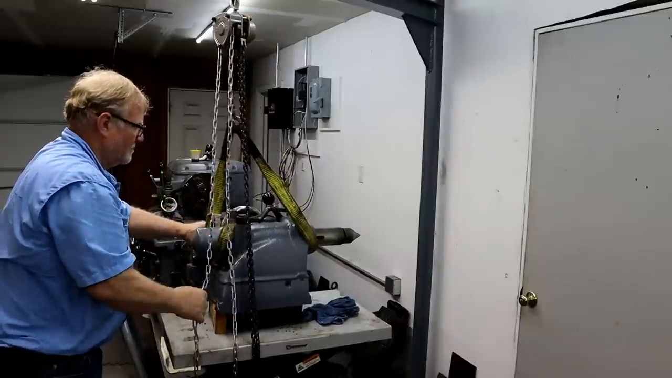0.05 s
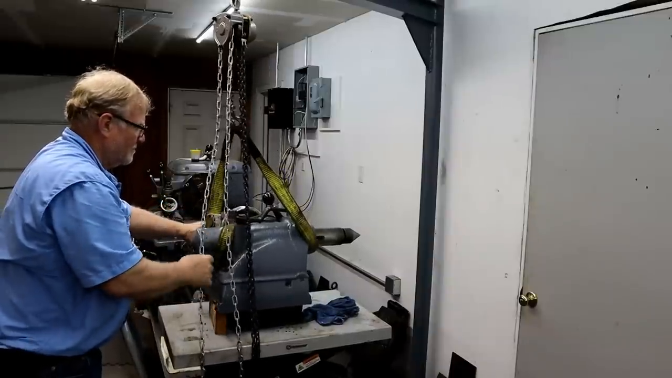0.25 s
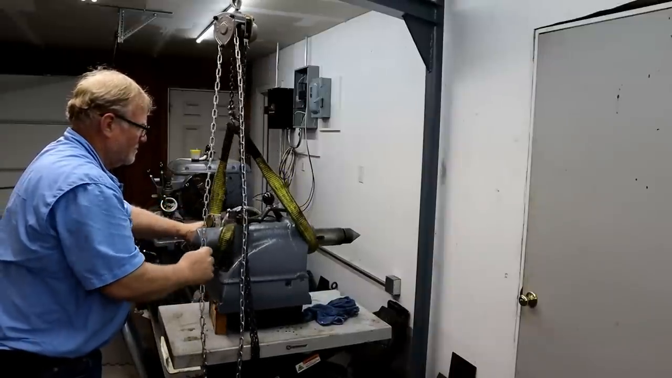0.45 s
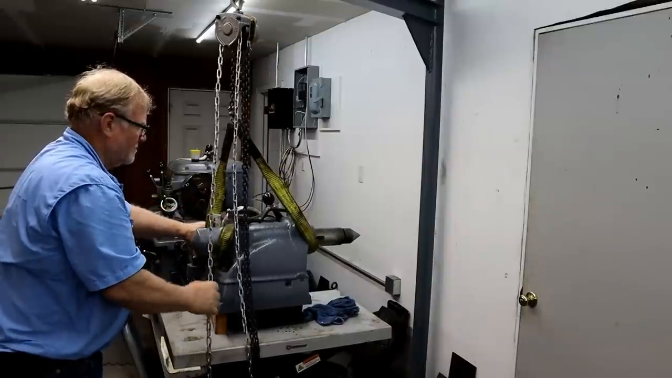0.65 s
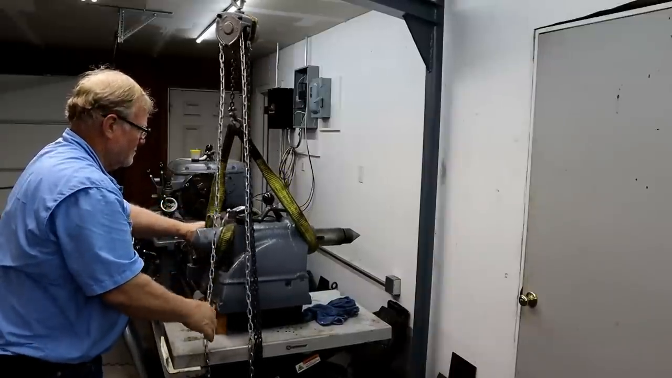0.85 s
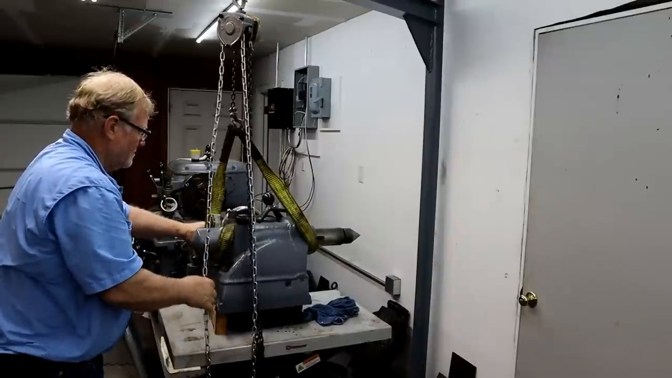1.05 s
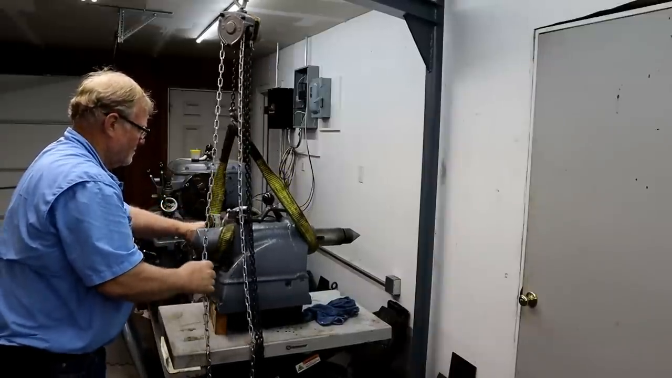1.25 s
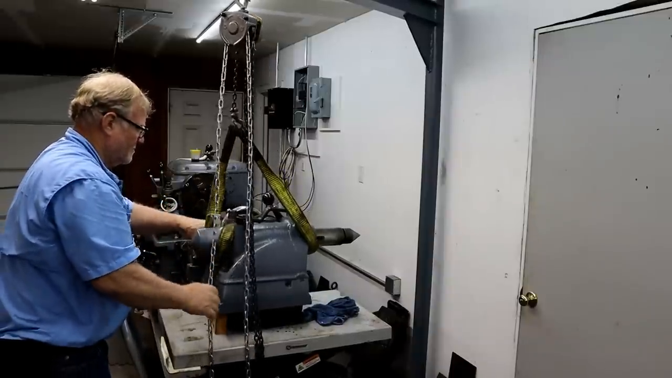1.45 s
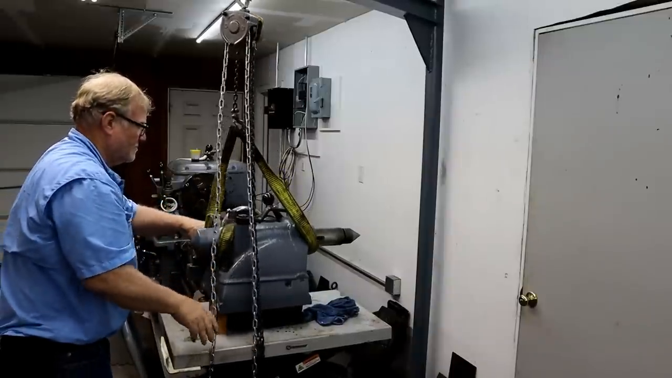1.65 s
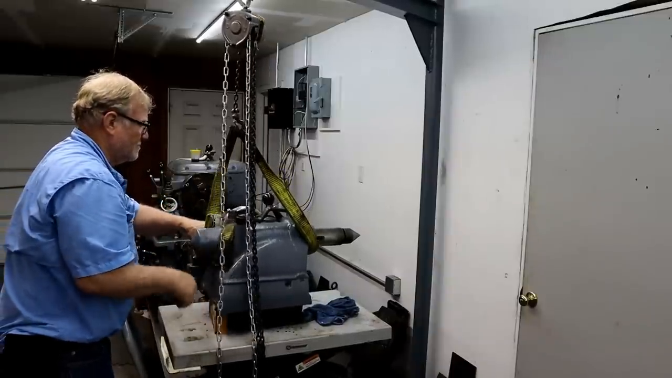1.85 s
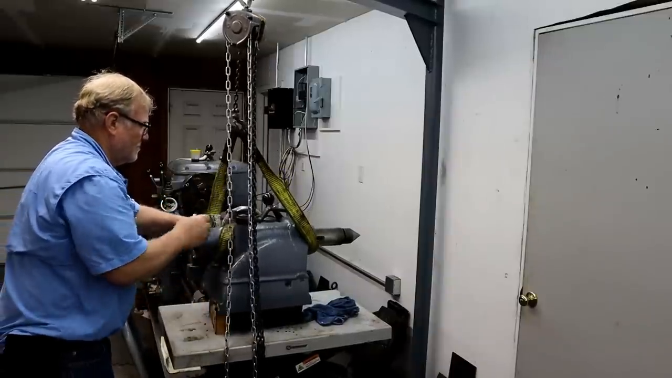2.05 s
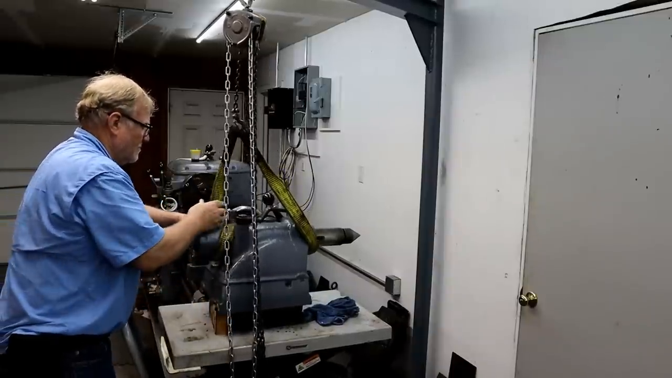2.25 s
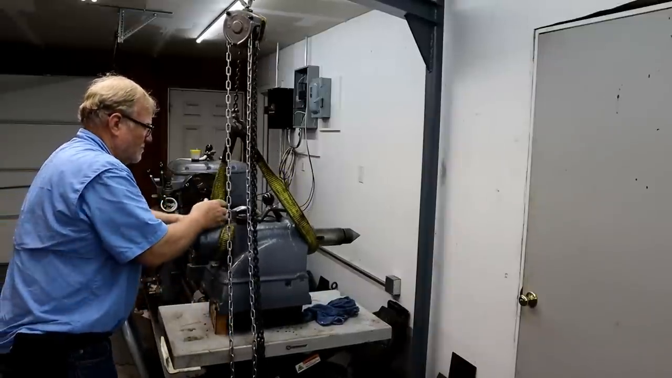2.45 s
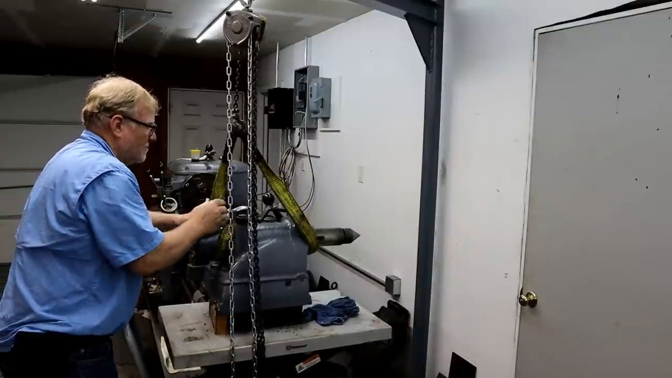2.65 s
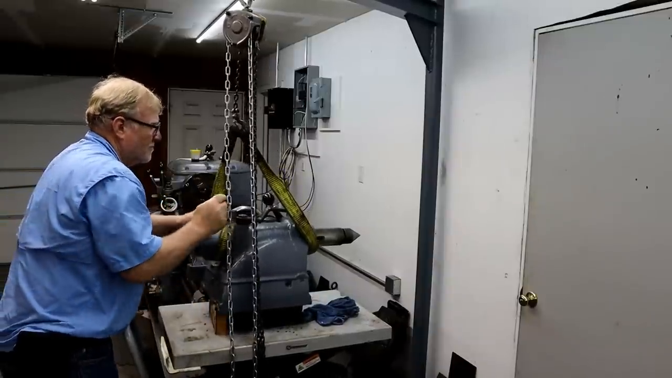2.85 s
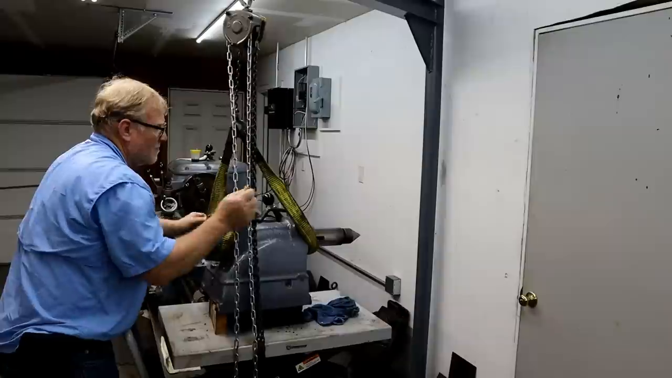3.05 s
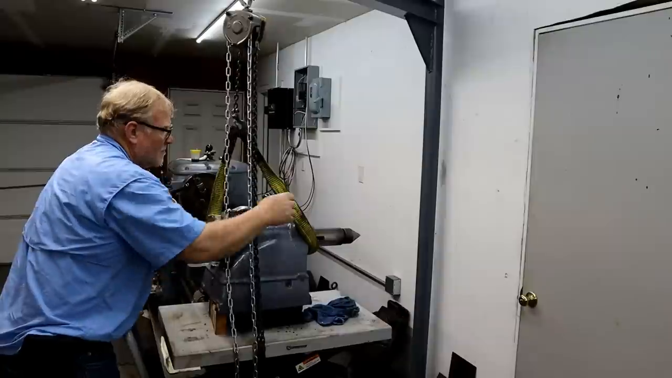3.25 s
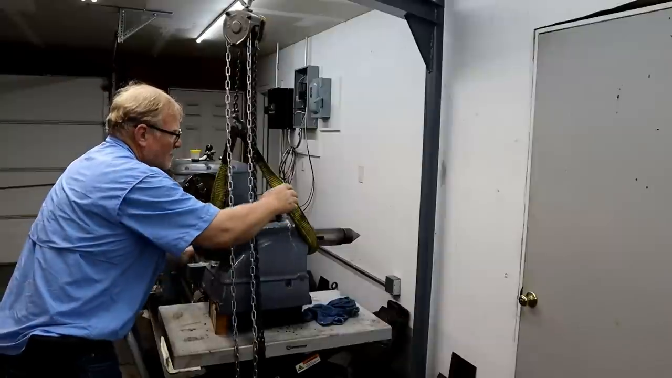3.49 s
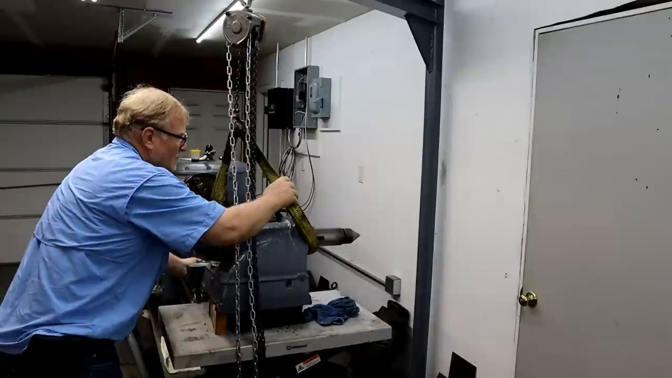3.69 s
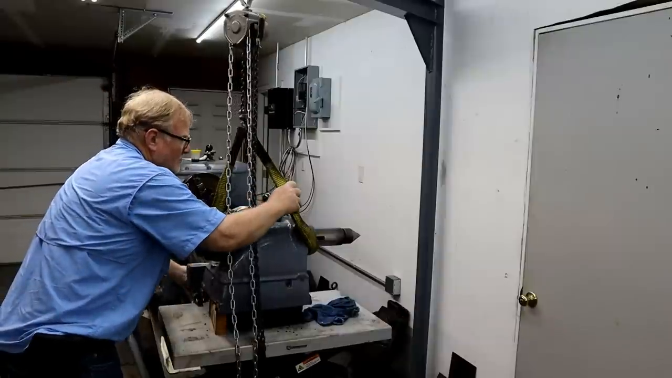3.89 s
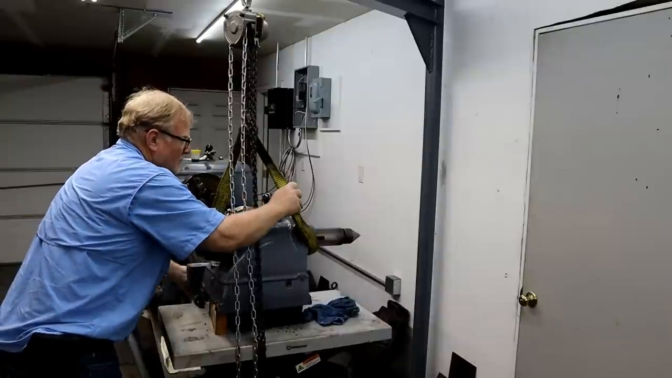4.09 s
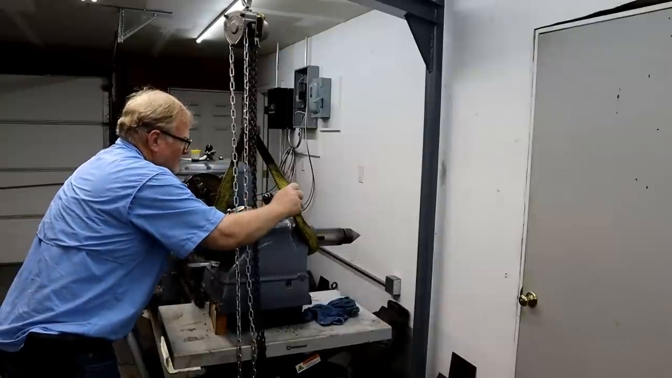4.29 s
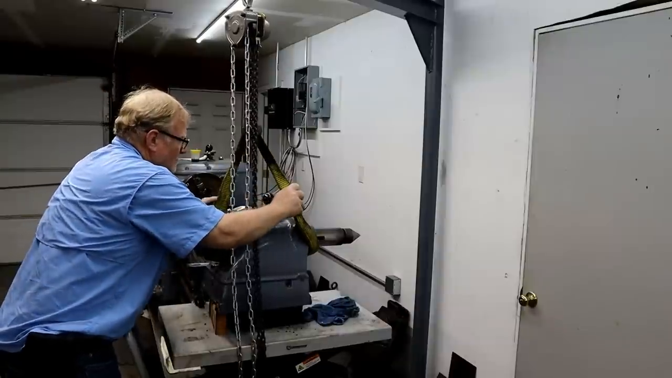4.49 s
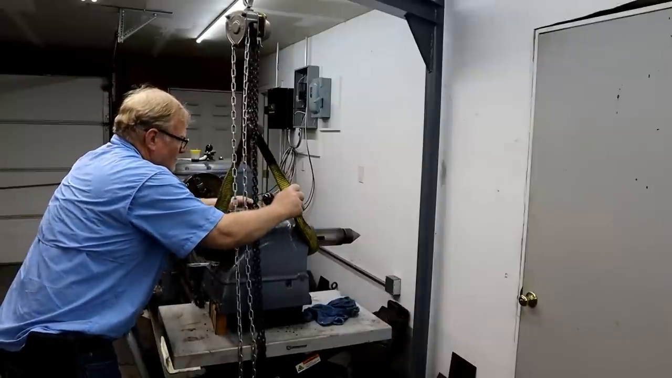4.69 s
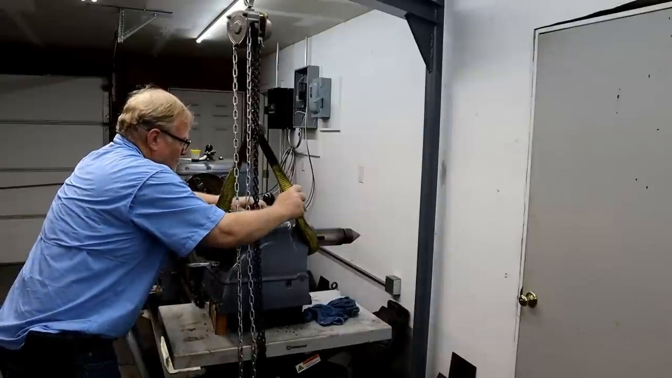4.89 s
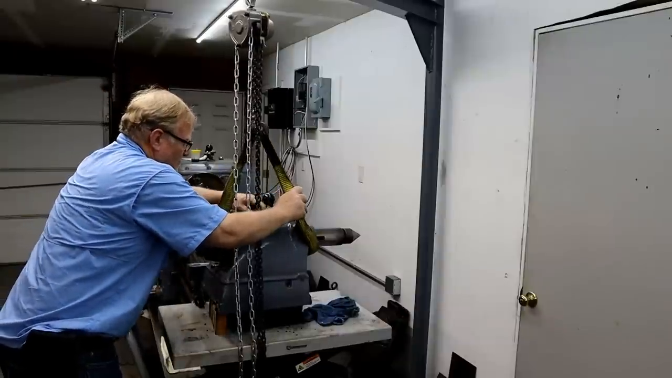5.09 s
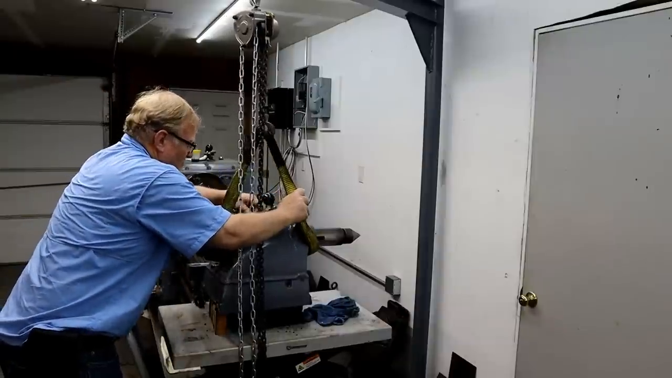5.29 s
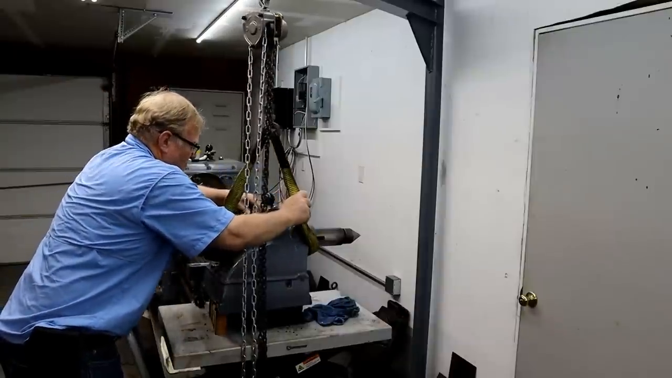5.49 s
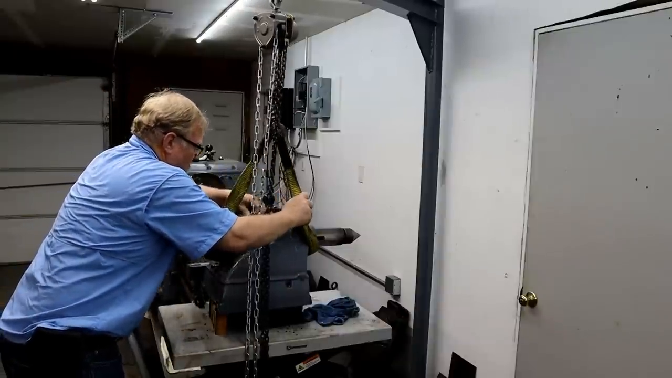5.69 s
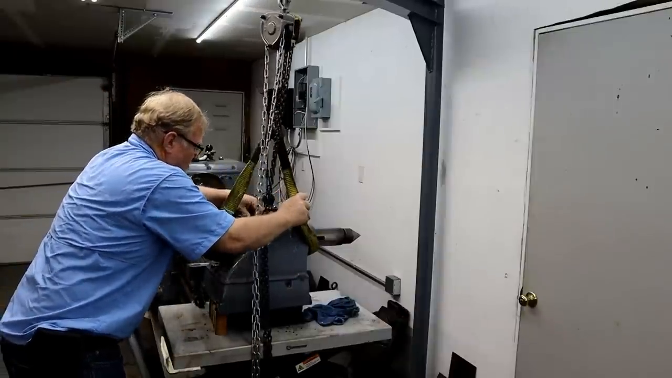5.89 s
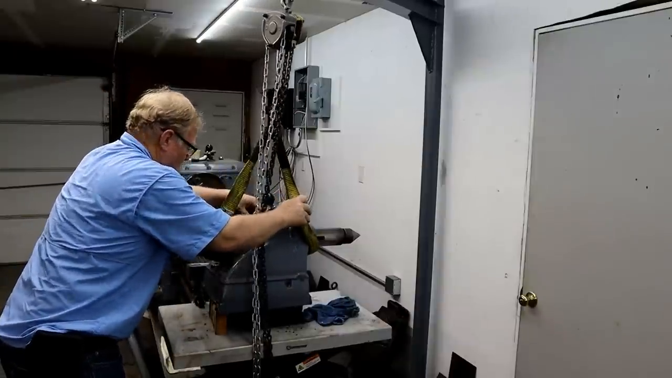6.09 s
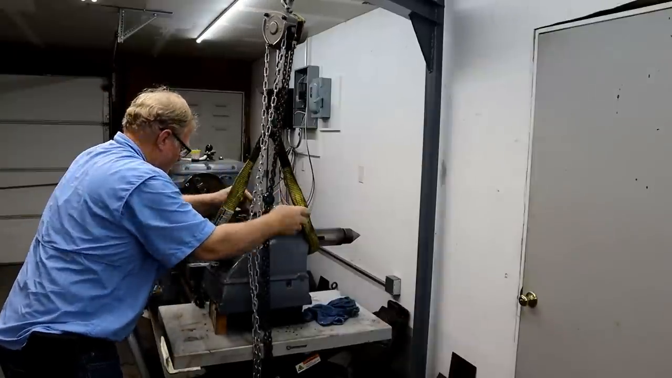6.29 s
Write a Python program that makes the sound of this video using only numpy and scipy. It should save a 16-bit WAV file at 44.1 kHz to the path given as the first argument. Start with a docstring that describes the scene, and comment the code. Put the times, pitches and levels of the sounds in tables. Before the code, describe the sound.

A small workshop with hard walls, heard in wide stereo from fairly close. From 0 to 0.6 s a steel hand chain runs fast through a hoist: dense bright links clash and jingle, the housing rattles, and a low frame thud sounds at the very start. A second pull runs from about 0.65 to 1.35 s, a third, slightly weaker, from 1.47 to 2.05 s. Then near quiet: slack links tick faintly, slings rub lightly until 2.55 s. A small crisp chain clink comes at 3.23 s. Soft rubbing and small knocks begin at 3.6 s; at 4.26 s one loud, sharp knock of the heavy casting on its wooden block rings, loose parts clattering until 4.5 s. After a lull, stronger dry rubbing and dull bumps come from 5.6 to 6.1 s, with low rumble, then sliding links and a faint hook grind to the end. A low wash grows until 3.7 s beneath thin hiss.

```python
"""A hand chain is hauled through a chain hoist in three pulls, in a small hard-walled workshop.
Links clink and knock on the hoist's housing: bursts of contacts excite decaying modes of steel.
Then slack chain ticks and slides, and the load is pushed round in its slings, which rub in small slips.
It gives one loud knock on its wooden block, held down by a limiter; hook and gantry ring as well.
Filtered noise makes a low wash, a rumble and a thin hiss behind it all."""
import sys
import numpy as np
from scipy import signal
from scipy.fft import rfft, irfft
from scipy.io import wavfile

SR = 44100
rng = np.random.default_rng(int(sys.argv[2]) if len(sys.argv) > 2 else 0)


def store_wav(level_fs):
    """Save 16-bit WAV to argv[1]."""
    pcm = np.round(np.clip(np.atleast_2d(level_fs), -1, 1) * 32767)
    wavfile.write(sys.argv[1], SR, pcm.T.astype(np.int16))


N = 279594  # length in samples

# All levels in dB are relative within their layer; the layer gains follow in the functions.

# modes of a link, damped by its neighbours: pitch_hz [Hz], level_db [dB], t60_s [s]
LINK_MODES = [(3250, 1.5, 0.029), (3730, -2.5, 0.017), (4080, 3.5, 0.039), (4540, 3.5, 0.026),
              (4900, 2, 0.028), (5286, 4.5, 0.032), (5600, -7, 0.027), (5770, 2.5, 0.021), (6310, 2, 0.03),
              (6800, 2.5, 0.023), (7720, -0.5, 0.018), (9190, -0.5, 0.034), (9780, 6.5, 0.023),
              (10580, 6, 0.025)]
# spectrum of running links: pitch_hz [Hz], level_db [dB]
LINK_COLOUR = [(200, -52), (700, 3.5), (2200, 1), (3500, 0), (5300, -1), (8000, 0), (10500, 4), (12000, -8),
               (14000, -43)]
# modes of the hoist's housing and hand wheel: pitch_hz [Hz], level_db [dB], t60_s [s]
HOUSING_MODES = [(800, -2, 0.24), (940, 7, 0.014), (1045, -1, 0.43), (1268, -13, .15), (1503, -2, .2),
                 (1685, -3, .18), (1877, 7.5, 0.18), (1910, 10, 0.028), (2110, 5, .14), (2950, 9, 0.1),
                 (3320, 6.5, 0.084), (3700, 2, .085)]
# spectrum of the housing: pitch_hz [Hz], level_db [dB]
HOUSING_COLOUR = [(100, -55), (250, -12.5), (520, -7.5), (800, 0.5), (2100, -2), (4500, -6), (8000, -16),
                  (14000, -93)]
# links ring only when the chain runs fast: their level is this power of the rattle level
RING_POWER = 1.68


def rattle():
    """Random excitation of modes: running links jostle each other and shake the hand wheel's housing."""
    haul = hauling()
    jostling = haul ** RING_POWER * contacts(per_s=220, spread_db=2.5)
    shaking = haul * contacts(per_s=300, spread_db=2.0)
    links = scattered(jostling, LINK_MODES, LINK_COLOUR, crack_db=5.5, wet_db=-3.0, detune=0.014)
    wheel = scattered(shaking, HOUSING_MODES, HOUSING_COLOUR,
                      crack_db=14, wet_db=11.5, detune=0.0015, count=2)
    return amp(6.5) * links + amp(-7.5) * wheel


# pulls on the hand chain: start_s [s], stop_s [s], level_db [dB]
PULLS = [(-.1, .62, -21), (.64, 1.35, -22), (1.47, 2.04, -23)]
# the hand gets up to speed, tires along the stroke and lets the chain run out
PULL_RISE_S, PULL_FALL_S, PULL_SAG_DB_PER_S = 0.12, 0.19, 15


def hauling():
    """Amplitude envelope of the excitation: how hard the hand chain runs."""
    return strokes(PULLS, PULL_RISE_S, PULL_FALL_S, PULL_SAG_DB_PER_S)


# hard clashes of the swinging chain: start_s [s], links_db [dB], housing_db [dB],
# settle_s (time over which the links settle) [s], tilt (brightness) [dB per octave]
CLINKS = [(.007, -1.5, -26.5, 0.0029, 2.5), (.0238, 2, -26, 0.0056, -3), (.0484, -3, -26, 0.0038, 2.5),
          (.0888, -2.5, -46, 0.0036, 3), (.1335, -6, -49, 0.004, 7), (.186, -4.5, -50, .004, 4.5),
          (.214, -7, -44, 0.0042, -1.5), (.257, -4, -23.5, .006, 1.5), (.317, -8, -22, 0.0063, 3),
          (.339, -6.5, -37, 0.0063, 0), (.3845, -10.5, -25.5, 0.0062, 0), (.5135, -10.5, -34, 0.0015, 6.5),
          (.618, -20.5, -37, 0.0016, -2), (.6399, -23, -40, 0.0027, -8), (.6678, -12.5, -29, 0.0066, -5.5),
          (.704, -3, -40, 0.0015, 0.5), (.7377, -11, -51, 0.0018, 9), (.762, -6, -27, 0.0046, -3.5),
          (.7862, 1, -27, 0.0017, -0.5), (.8544, 0.5, -20, 0.0025, 0.5), (.884, -5.5, -21, 0.0042, 4),
          (.922, -0.5, -22.5, 0.0042, 2), (.951, -4.5, -36, 0.0036, -1), (.9957, -4.5, -45, 0.0017, 6),
          (1.0311, -6.5, -36, 0.0033, -3), (1.0465, -14, -28, 0.0029, -1), (1.0949, -8.5, -27, 0.0033, -4),
          (1.174, -38, -28, 0.0024, -8), (1.461, -29, -34.5, 0.0034, -10), (1.474, -19, -37, 0.0022, -5),
          (1.503, -12.5, -24.5, 0.0055, -8), (1.553, -3.5, -25, 0.0012, -0.5),
          (1.573, -21, -48, 0.0013, -2), (1.594, -8, -35, 0.0055, -1), (1.612, -9, -30, 0.0039, -3),
          (1.649, -2.5, -21.5, 0.0039, 0.5), (1.6883, -4.5, -49, 0.0032, -2), (1.7425, -4, -25, 0.0025, 1),
          (1.771, -15, -40, 0.0017, -7), (1.8105, -10, -29, 0.0032, -6), (1.866, -7, -25.5, 0.0023, 0.5),
          (1.895, -13.5, -32, 0.0024, 5), (2.12, -22, -39.5, 0.0026, 4), (2.125, -22, -42.5, .0015, -1),
          (2.3758, -21, -35, 0.0016, 6), (3.224, -9, -33, 0.0036, -3), (3.2285, -6, -31, 0.0021, 1.5),
          (3.233, -7.5, -34.5, 0.0017, 1), (3.24, -23, -36, 0.0014, 0), (3.265, -28, -26.5, 0.0053, 0),
          (3.275, -32, -28, 0.003, -5), (3.6274, -21, -42.5, 0.0013, -7.5)]


def clinks(count=8, size=2048):
    """Multiple impact: a clash or a seating link rings a few links and knocks on the housing."""
    rows = np.vstack([CLINKS, seatings()])
    places = np.zeros((count, N))
    for k, (s, db, _, settle, tilt) in enumerate(rows):
        force = clashes([(0, db, settle)])[:size]
        for j, sound in enumerate(struck_links(force, tilt)):
            add(places[(k + j) % count], s, sound)
    links = sum(shop(place, wet_db=2.7) for place in places)
    knocks = clashes(rows[:, [0, 2, 3]])
    housing = scattered(knocks, HOUSING_MODES, HOUSING_COLOUR,
                        crack_db=14.5, wet_db=5.0, detune=0.0034, count=3)
    return amp(12.0) * links + amp(26.5) * housing


# seating links come at a nearly even rate; their levels are relative to the rattle
LINKS_PER_S, LINK_JITTER_S = 23, 0.01
SEAT_LINKS_DB, SEAT_HOUSING_DB, SEAT_SPREAD_DB = 15, -7.5, 6.5
SEAT_SETTLE_S, SEAT_TILT_DB_PER_OCTAVE = .0045, -6


def seatings(count=48):
    """Nearly periodic impacts: links drop into the wheel's pockets as hard as the chain runs (clash rows)."""
    late, bright, dull = rng.standard_normal((count, 3)).T
    s = np.arange(1, count + 1) / LINKS_PER_S + LINK_JITTER_S * late
    haul_db = 20 * np.log10(np.interp(s, np.arange(N) / SR, hauling()) + 1e-9)
    links_db = RING_POWER * haul_db + SEAT_LINKS_DB + SEAT_SPREAD_DB * bright
    housing_db = haul_db + SEAT_HOUSING_DB + SEAT_SPREAD_DB * dull
    settle_s = np.full(count, SEAT_SETTLE_S)
    tilt = np.full(count, SEAT_TILT_DB_PER_OCTAVE)
    return np.column_stack([s, links_db, housing_db, settle_s, tilt])


# spectrum of clashing links before the tilt: pitch_hz [Hz], level_db [dB]
CLASH_COLOUR = [(200, -50), (700, -46), (2200, -9), (3700, -1.5), (5300, 0.5), (8000, -2), (10500, -7),
                (12000, -8.5), (14000, -29.5)]
TILT_PIVOT_HZ = 5000
CLASH_CRACK_DB = 3  # a link's crack against its ringing
LINK_DETUNE = .011  # links differ slightly in pitch (share of the frequency)
STRIKE_SPREAD_DB = 3.5  # the place of the blow makes each mode stronger or weaker


def struck_links(force, tilt, count=3):
    """Modal excitation: neighbouring links share the contacts of one clash, one sound for each link."""
    tint = [(hz, db + tilt * np.log2(hz / TILT_PIVOT_HZ)) for hz, db in CLASH_COLOUR]
    which = np.cumsum(force != 0) % count
    sounds = []
    for j in range(count):
        link = struck(LINK_MODES, tint, CLASH_CRACK_DB, crack_s=0.00049, detune=LINK_DETUNE,
                      spread_db=STRIKE_SPREAD_DB, size=4096)
        sounds.append(signal.fftconvolve(force * (which == j), link))
    return sounds


# light touches of slack links: start_s [s], level_db [dB], settle_s [s]
TICKS = [(2.2438, -34, 0.0022), (2.2975, -33, 0.0015), (2.469, -29, 0.0025), (2.4997, -29, 0.0014),
         (2.669, -37.5, 0.00071), (2.8773, -35, 0.004), (3.1837, -26, 0.00062), (4.164, -28.5, 0.004),
         (5.944, -28, 0.0091)]
# slack chain slides over itself: start_s [s], stop_s [s], level_db [dB]
SLIDES = [(2.49, 2.6, -49), (5.93, 6.11, -53), (6.17, 6.36, -48.5)]
# spectrum of slack links: pitch_hz [Hz], level_db [dB]
TICK_COLOUR = [(500, -13), (3000, -8), (7000, -4.5), (11000, -0.5), (14500, -29)]
SLIDE_RISE_S, SLIDE_FALL_S, SLIDE_SAG_DB_PER_S = 0.0093, 0.035, 36


def slack():
    """Light impact and sliding friction: hanging links touch and slide over each other."""
    gain = strokes(SLIDES, SLIDE_RISE_S, SLIDE_FALL_S, SLIDE_SAG_DB_PER_S)
    sliding = gain * contacts(per_s=1200, spread_db=10.0)
    ticks = scattered(clashes(TICKS), LINK_MODES, TICK_COLOUR,
                      crack_db=22, wet_db=11, detune=0.022, count=3)
    slides = scattered(sliding, LINK_MODES, TICK_COLOUR,
                       crack_db=32, wet_db=-1, detune=.02, count=2)
    return amp(12.5) * ticks + slides


# knocks of the load: start_s [s], level_db [dB], contact_s [s]
KNOCKS = [(3.593, -26, 0.000095), (3.626, -32.5, 0.00008), (3.742, -35, 0.000046), (4.068, -38.5, .000047),
          (4.2586, 2, 0.000015), (4.2655, -9.5, 0.000057), (5.628, -30, 0.00019), (5.871, -31, .0002),
          (5.97, -24, 0.00027)]
# modes of the load: pitch_hz [Hz], level_db [dB], t60_s [s]
LOAD_MODES = [(350.3, -20.5, 0.37), (608, -18, 0.23), (855, -23, 0.19), (925, -21.5, 0.27),
              (1079, -14.5, 0.18), (1208, -16, 0.17), (1267, -14, 0.13), (1337, -18.5, .22),
              (1544, -17.5, 0.25), (1653, -11, 0.15), (1997, -15.5, 0.25), (2590, -12, 0.16),
              (2955, -24, .18), (3650, -10, 0.14)]
# modes of the wooden block under the load: pitch_hz [Hz], level_db [dB], t60_s [s]
BLOCK_MODES = [(1042, -1, 0.059), (1110, -6, .03), (1940, -6.5, 0.024)]
# spectrum of load and block: pitch_hz [Hz], level_db [dB]
LOAD_COLOUR = [(80, -32), (200, -16.5), (300, 3.5), (450, -8), (620, -0.5), (850, 3), (1250, 0.5),
               (1900, -2), (2300, -7), (4200, -7.5), (6500, -19), (10500, -25.5), (13500, -37)]
# loose parts clatter after the loud knock: start_s [s], stop_s [s], level_db [dB]
CLATTERS = [(4.28, 4.5, -22.5)]
# slings rub as the load turns: start_s [s], stop_s [s], level_db [dB]
RUBS = [(2.12, 2.55, -48), (3.56, 4.04, -45), (4.03, 4.35, -46), (5.6, 5.75, -41.5), (5.79, 6.0, -37.5),
        (5.93, 6.14, -37.5), (6.16, 6.45, -47)]
# spectrum of the rubbing: pitch_hz [Hz], level_db [dB]
RUB_COLOUR = [(150, -41), (500, 1.5), (1050, 2), (1800, -3), (2500, -10.5), (4000, -14), (8000, -23),
              (14000, -37)]
RUB_RISE_S, RUB_FALL_S, RUB_SAG_DB_PER_S = 0.051, 0.096, 6


def load():
    """Impact and stick-slip: the casting knocks on its block, loose parts clatter, slings rub in slips."""
    force = blows(KNOCKS)
    casting = rung(force, struck(LOAD_MODES, LOAD_COLOUR, crack_db=13.5, crack_s=0.007))
    block = rung(force, struck(BLOCK_MODES, LOAD_COLOUR, crack_db=1, crack_s=0.0079))
    shaking = strokes(CLATTERS, SLIDE_RISE_S, SLIDE_FALL_S, SLIDE_SAG_DB_PER_S)
    shaken = shaking * contacts(per_s=268, spread_db=4.0)
    clatter = scattered(shaken, LOAD_MODES, LOAD_COLOUR,
                        crack_db=7, wet_db=5, detune=0.0313, count=2)
    slips = evened(colour(contacts(per_s=610, spread_db=7.0), RUB_COLOUR))
    rub = strokes(RUBS, RUB_RISE_S, RUB_FALL_S, RUB_SAG_DB_PER_S) * slips
    knocks = amp(25.5) * shop(casting, wet_db=18.0) + amp(18.5) * shop(block, wet_db=-9)
    return knocks + clatter + amp(-2.5) * shop(rub, wet_db=3.5)


# the hook grinds as the load swings round: start_s [s], stop_s [s], level_db [dB]
GRINDS = [(6.19, 6.45, -49.5)]
# modes of the hook: pitch_hz [Hz], level_db [dB], t60_s [s]
HOOK_MODES = [(1750, -3, .07), (2170, 0, 0.062), (2390, 3, .07), (3144, 1, .08), (3230, -7, .06),
              (4350, 1, .05), (5970, -6, .05)]


def hook():
    """Stick-slip excitation: tiny slips of the hook in its eye keep it ringing."""
    gain = strokes(GRINDS, RUB_RISE_S, RUB_FALL_S, RUB_SAG_DB_PER_S)
    slips = gain * contacts(per_s=300, spread_db=1)
    flat = [(1000, -2), (14000, -2)]
    return scattered(slips, HOOK_MODES, flat, crack_db=-14, wet_db=6, detune=0.011, count=4)


# the hoist takes up the weight: start_s [s], level_db [dB], contact_s [s]
THUDS = [(.031, 3.5, .00045), (.0365, -3.5, 0.00008), (.049, -7, 0.000072), (.11, -6, 0.0004)]
# modes of the gantry under the hoist: pitch_hz [Hz], level_db [dB], t60_s [s]
GANTRY_MODES = [(203, 5, 0.11), (259.6, -1.5, 0.59), (270, 13, 0.068), (406, -5, 0.18), (598, -4, 0.18),
                (643, 5, 0.058), (786, -23, 0.28), (1064, -9, 0.26)]
# spectrum of the gantry: pitch_hz [Hz], level_db [dB]
GANTRY_COLOUR = [(60, -24), (120, -17), (200, -4), (300, 4), (450, 1), (1000, 6), (2200, 3.5), (6000, -31),
                 (14000, -83)]


def gantry():
    """Impulse response of a frame: it thuds as the lift chain jerks."""
    frame = struck(GANTRY_MODES, GANTRY_COLOUR, crack_db=9.5, crack_s=0.0055)
    return amp(19.0) * shop(rung(blows(THUDS), frame), wet_db=-3)


# spectra of the low wash, the rumble and the thin hiss: pitch_hz [Hz], level_db [dB]
WASH_COLOUR = [(25, -13.5), (100, -8.5), (142, -1.5), (185, -9), (235, -0.5), (290, -6), (450, -6),
               (830, -11.5), (1160, -15.5), (1800, -20), (2700, -27), (8000, -49.5), (14000, -63)]
RUMBLE_COLOUR = [(20, -7), (45, -9), (70, 5), (110, -16), (220, -12), (1000, -61)]
HISS_COLOUR = [(1000, -21), (4000, -8.5), (8000, -13.5), (9100, -10.5), (9900, -2.5), (10700, -2.5),
               (11700, -13), (14500, -27)]
# levels of the shop's wash, of the rumble as the weight shifts, and of the hiss: time_s [s], level_db [dB]
WASH_LEVEL = [(0, -57.5), (2.6, -48.5), (3.7, -41), (5.3, -41.5), (6.1, -40.5), (6.22, -37.5),
              (6.33, -40.5)]
RUMBLE_LEVEL = [(0, -75), (1.2, -65), (2.4, -105), (3.5, -66), (5.5, -57.5), (5.75, -44.5), (6.3, -53.5)]
HISS_LEVEL = [(0, -56), (2.9, -61.5), (3.8, -57.5), (6.3, -57.5)]


def background():
    """Noise under slow envelopes: a low wash, its level rising from the start until 3.7 s, a rumble, a hiss."""
    wash = air(WASH_COLOUR) * level(WASH_LEVEL)
    rumble = air(RUMBLE_COLOUR) * level(RUMBLE_LEVEL)
    hiss = air(HISS_COLOUR) * level(HISS_LEVEL)
    return wash + rumble + hiss


def air(tint):
    """Diffuse field: independent noises of one colour as middle and side."""
    return pair(*(evened(colour(rng.standard_normal(N), tint, size=8192)) for _ in range(2)))


def strokes(rows, rise_s, fall_s, sag_db_per_s):
    """Envelope of movements: each gain rises, holds with a slow sag and falls to rest."""
    t = np.arange(N) / SR
    total = 0
    for start, stop, db in rows:
        rise = np.clip((t - start) / rise_s, 0, 1)
        fall = np.clip((stop - t) / fall_s, 0, 1)
        total = total + rise * fall * amp(db - sag_db_per_s * np.maximum(t - start, 0))
    return total


def contacts(per_s, spread_db):
    """Random impulse process: contacts of uneven force, rms 1."""
    force = amp(spread_db * np.minimum(rng.exponential(1, N), 3)) * rng.choice([-1, 1], N)
    return evened(force * (rng.random(N) < per_s / SR))


def clashes(rows, first=0.83, build=1.0, count=12):
    """Repeated impact: a lighter first touch, then a quick run of contacts that dies away."""
    out = np.zeros(N)
    for s, db, settle in rows:
        lag = (np.arange(count) + rng.uniform(-.4, .4, count)) * 2 / count  # in settling times
        lag[0] = 0
        force = np.minimum(first + lag / build, 1) * np.exp(-lag) * rng.choice([-1, 1], count)
        at = ((s + lag * settle) * SR).astype(int)
        heard = (at >= 0) & (at < N)
        np.add.at(out, at[heard], amp(db) * force[heard] / np.linalg.norm(force))
    return out


def blows(rows, size=512):
    """Contact mechanics: one force pulse for each blow; a longer contact sounds duller."""
    out = np.zeros(N + size)
    t = np.arange(size) / SR
    for s, db, contact in rows:
        push = (t + 1 / SR) * np.exp(-t / contact)
        out[int(s * SR):][:size] += amp(db) * push / push.sum()
    return out[:N]


def struck(modes, tint, crack_db, crack_s, detune=0, spread_db=0, size=14700):
    """Modal synthesis: a body answers one blow with a short crack and dying modes, energy 1."""
    t = np.arange(size) / SR
    ring = 0
    for (hz, db, t60), (strong, sharp) in zip(modes, rng.standard_normal((len(modes), 2))):
        decay = amp(db + spread_db * strong - 60 * t / t60)
        ring = ring + decay * np.sin(2 * np.pi * hz * (1 + detune * sharp) * t)
    burst = rfft(rng.standard_normal(len(t)) * np.exp(-t / crack_s))
    flat = irfft(burst / abs(burst), len(t))  # equally strong at all pitches
    crack = flat * np.exp(-.5 * t / crack_s)
    sound = colour(evened(ring) + amp(crack_db) * evened(crack), tint)
    return evened(sound) / np.sqrt(len(t))


def rung(drive, body):
    """Linear response: a force passed through a body's ringing."""
    return convolve(drive, body)[0]


def scattered(drive, modes, tint, crack_db, wet_db, detune, count=6):
    """Distributed sources: contacts land at several places, each with its own tuning and echoes."""
    place = rng.integers(0, count, N)
    bodies = [struck(modes, tint, crack_db, crack_s=0.0008, detune=detune) for _ in range(count)]
    return sum(shop(rung(drive * (place == k), body), wet_db) for k, body in enumerate(bodies))


def add(mix, s, sound):
    """Superposition: mixes a sound in at its time."""
    part = mix[max(round(s * SR), 0):][:len(sound)]
    part += sound[:len(part)]


# reverberation time of the shop: pitch_hz [Hz], t60_s [s]
SHOP_T60 = [(150, 0.49), (500, 0.59), (1200, 0.72), (2500, 0.68), (5000, 0.59), (8000, 0.49), (13000, 0.33)]


def tail(size=10, count=26000):
    """Reverberation: sparse reflections, stronger at first, each band dying at its own speed."""
    taps = rng.choice([-1., 1.], count) * (rng.random(count) < 1 / size)
    hz, t, z = signal.stft(taps, SR, nperseg=256)
    near_walls = 1 + 1.27 * np.exp(-t / 0.02)
    decay = amp(-60 * t / read(SHOP_T60, hz)[:, None])
    out = signal.istft(z * near_walls * decay, SR, nperseg=256)[1][:count]
    out *= np.minimum(np.arange(count) / (0.0056 * SR), 1)  # the reflections fade in
    return out / np.linalg.norm(out)


def shop(x, wet_db):
    """Direct and reverberant field: a sound from a little to one side, and off the walls."""
    mid, side = amp(wet_db) * tail(), amp(wet_db) * tail()
    mid[0] += 1
    side[3] -= .6
    return convolve(x, pair(mid, side)) / np.hypot(1, amp(wet_db))


# gain of side against mid: pitch_hz [Hz], level_db [dB]
WIDTH = [(50, -25), (300, -11), (700, -6.5), (1200, -2.5), (2000, 0.5), (3300, 4), (6000, 4), (11000, 6.5)]


def pair(mid, side):
    """Mid-side stereo, left and right: bass in the middle, treble very wide."""
    side = colour(side, WIDTH)
    return np.array([mid + side, mid - side])


def colour(x, points, size=2048):
    """Minimum-phase filtering: a causal filter with the given spectrum."""
    log_gain = np.log(amp(read(points, abs(np.fft.fftfreq(size, 1 / SR)))))
    taps = np.fft.ifft(np.exp(np.conj(signal.hilbert(log_gain)))).real
    return signal.oaconvolve(x, taps[:size // 2])[:len(x)]


def convolve(x, response):
    """Convolution cut to the length of the scene."""
    return signal.oaconvolve(np.atleast_2d(x), np.atleast_2d(response), axes=1)[:, :N]


def read(points, hz):
    """Interpolation of a spectrum table on a log-frequency axis."""
    f, value = np.transpose(points)
    return np.interp(np.log(hz + 1), np.log(f), value)


def level(rows):
    """Envelope: a dB curve as a gain for every sample."""
    return amp(np.interp(np.arange(N) / SR, *np.transpose(rows)))


def amp(db):
    """Logarithmic level: decibels to gain."""
    return 10 ** (np.asarray(db) / 20)


def evened(x):
    """Normalization: scaled to rms 1."""
    return x / np.sqrt(np.mean(x ** 2) + 1e-20)


def scene(right_db=0.7):
    """Superposition of all that sounds in the shop, raised on the right and lowered on the left."""
    chain = rattle() + clinks() + slack()
    weight = load() + hook() + gantry()
    return (chain + weight + background()) * amp([[-right_db], [right_db]])


def limited(x, threshold_db=-16, recover_db_per_s=90, size=260):
    """Dynamic range control: the gain drops fast and comes back at a steady rate in dB."""
    power = signal.lfilter(np.ones(size) / size, 1, (x ** 2).mean(0))
    over_db = np.maximum(10 * np.log10(power + 1e-12) - threshold_db, 0)
    fall = np.arange(N) * recover_db_per_s / SR
    held_db = np.maximum.accumulate(over_db + fall) - fall
    keep = np.exp(-1 / (0.0008 * SR))  # smooths the gain
    return x / amp(signal.lfilter([1 - keep], [1, -keep], held_db))


EDGE_HZ = 14700  # upper band limit


def record(dry):
    """Nonlinear and linear transmission: limiter, overload and band limit."""
    loud = np.clip(limited(dry, threshold_db=-10.5, recover_db_per_s=63), -1, 1)
    low_pass = signal.firwin(255, EDGE_HZ, window=("kaiser", 9), fs=SR)
    return signal.oaconvolve(loud, low_pass[None], "same")


dry = scene()
out = record(dry)
store_wav(out)
```